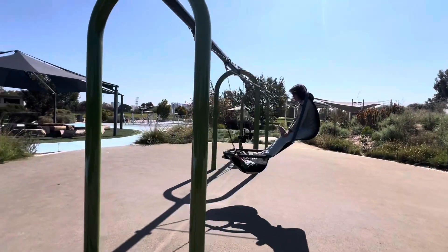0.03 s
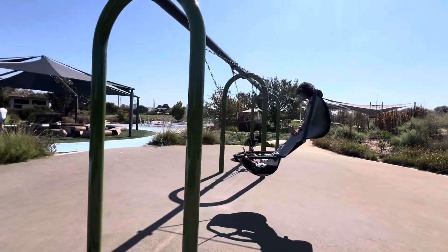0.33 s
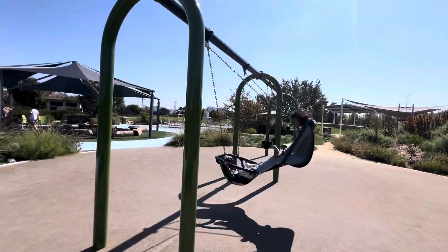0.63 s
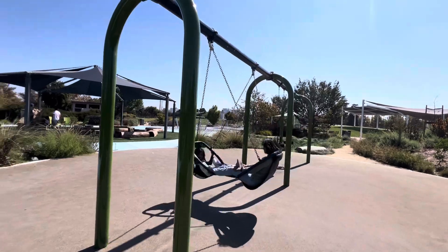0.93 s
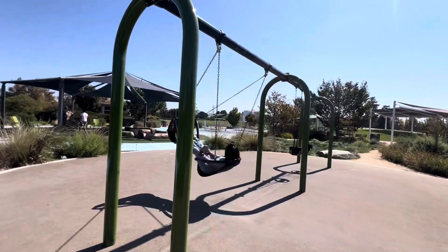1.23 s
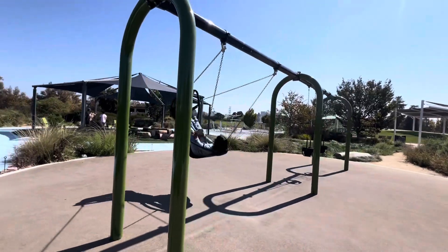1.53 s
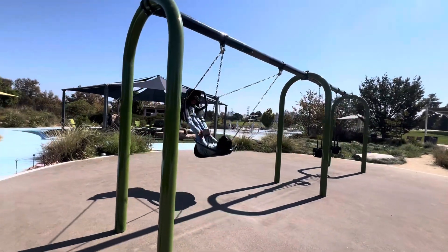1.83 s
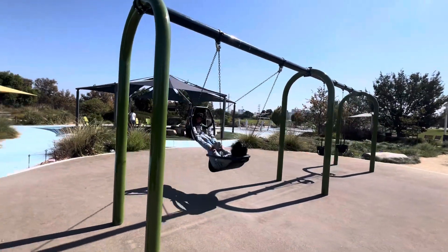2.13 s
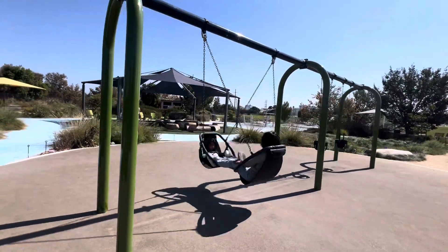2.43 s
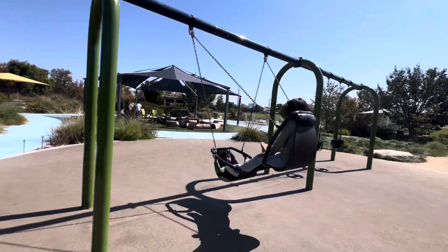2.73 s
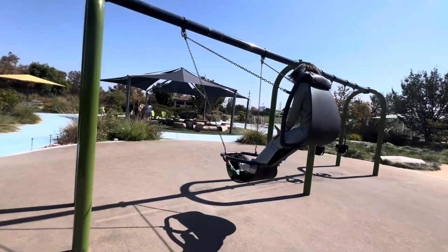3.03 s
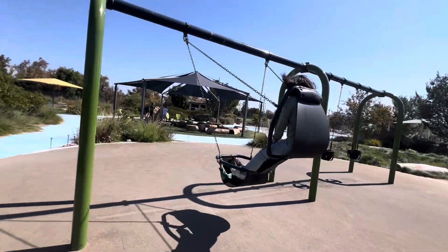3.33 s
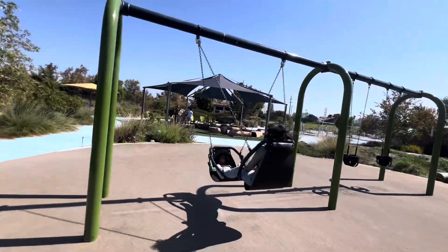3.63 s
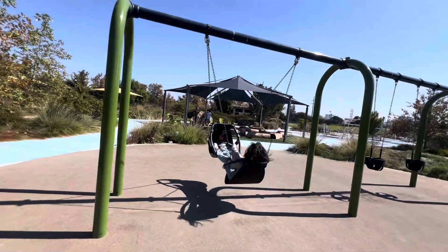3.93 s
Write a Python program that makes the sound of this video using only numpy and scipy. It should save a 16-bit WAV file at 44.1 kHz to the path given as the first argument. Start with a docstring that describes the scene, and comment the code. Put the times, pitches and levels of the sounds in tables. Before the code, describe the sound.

A playground swing's steel chains clack, briefly ringing the frame: a sharp cluster around 0.5 to 0.7 seconds, a softer clack at 1.3, and more at 2.6 and 3.5. Light ticks and faint rubs fall between. A far bird chirps faintly three times in the first second. Distant traffic and wind rumble throughout under a faint hiss, and a vehicle's humming tyres swell past from about 2 seconds.

```python
"""An open playground, where a chair swing sways on steel chains. Each time the load shifts, links slip
and clack against the hangers, briefly ringing the steel frame; light ticks and soft rubs fall in between.
A far bird chirps three times. Behind it, distant traffic rumbles over a deep drone of wind and engines,
one vehicle swells past on humming tyres, and a faint hiss sits on top."""
import sys
import numpy as np
from scipy import signal
from scipy.fft import rfft, irfft
from scipy.io import wavfile
from scipy.ndimage import uniform_filter1d

SR = 44100
rng = np.random.default_rng(int(sys.argv[2]) if len(sys.argv) > 2 else 0)


def wav_record(signal):
    """Record a signal, one row per channel, as 16-bit PCM in the file named by sys.argv[1]."""
    frames = np.transpose(np.atleast_2d(signal))
    bounded = np.clip(frames, -1, 1)
    # unit amplitude maps onto the largest positive 16-bit level
    quanta = np.round(bounded * 32767).astype(np.int16)
    wavfile.write(sys.argv[1], SR, quanta)


N = 176400
TIME = np.arange(N) / SR
CUTOFF_HZ = 15900


# link slips: start_s, level_db, brightness_db_per_octave, attack_s, chatter_s
LINK_SLIPS = [(.117, -54, -2, 0.0012, 0.0082), (0.1434, -44, -1.5, 0.0011, 0.0023),
              (0.502, -55.5, 0, 0.0016, 0.0061), (0.5415, -31.5, 1.5, 0.0063, 0.0061),
              (0.5841, -31.5, 1.3, 0.0016, 0.008), (0.688, -30.5, 1.44, 0.00061, 0.012),
              (1.3381, -45, 1, 0.0018, .009), (1.354, -45.5, -0.5, .003, 0.011),
              (2.5604, -34.5, 1.3, 0.0051, 0.009), (2.585, -38, -2, 0.002, 0.0026),
              (2.999, -57.5, -4, 0.0028, 0.0104), (3.405, -52, -1.5, 0.0038, 0.012),
              (3.465, -44.5, -2, 0.0023, 0.012), (3.4825, -35.5, -0.3, 0.00078, 0.0068),
              (3.536, -31, 0, 0.0011, 0.012)]

def clacks(contacts_per_s=2100, contact_decay_s=0.005, contact_db=1, strike_spread_db=3.5):
    """A link slips, chatters for a few milliseconds in sharp contacts, and leaves the frame ringing."""
    hz, gain, t60 = frame_modes()
    t, out = np.arange(8192) / SR, np.zeros((2, N))
    modes = np.exp((2j * np.pi * hz - np.log(1000) / t60)[:, None] * t)
    bins = np.fft.rfftfreq(len(t), 1 / SR)
    clack_eq = unit(amp(read(CLACK_COLOUR, bins)))
    for start, db, brightness, attack, chatter in LINK_SLIPS:
        tilt = lambda f: amp(brightness * np.log2((f + 100) / 5000))
        strike = gain * tilt(hz) * amp(strike_spread_db * rng.standard_normal(len(hz)))
        phases = np.exp(2j * np.pi * rng.random((2, len(hz))))
        ring = ((strike * phases) @ modes).real
        ring *= np.exp(np.log(1000) / np.median(t60) * np.minimum(t, chatter))  # chatter holds the ring up
        hits = rng.standard_normal((2, len(t))) * (rng.random((2, len(t))) < contacts_per_s / SR)
        contacts = irfft(rfft(unit(hits)) * clack_eq * tilt(bins)) * np.exp(-t / contact_decay_s)
        add(out, start, amp(db) * np.minimum(t / attack, 1) * (ring + amp(contact_db) * contacts))
    return out


# tone colour of the clacks, with dips near 10 and 14 kHz: freq_hz, gain_db
CLACK_COLOUR = [(150, -7), (450, 7), (800, 3.5), (1100, 11), (2300, 8.5), (4100, -0.5), (4700, 3.5),
                (5400, 1.5), (6300, 4), (7200, -4.5), (9200, 0), (10100, -8), (11200, 0), (12500, -1),
                (13700, -12), (15200, 2)]
# ring time of the frame: freq_hz, t60_s
FRAME_DECAY = [(400, 0.17), (1000, 0.17), (2200, 0.15), (5500, 0.1), (10000, 0.16), (15000, 0.12)]
# strongest modes of hanger and crossbar, several in close pairs: pitch_hz, gain_db
HANGER_MODES = [(938, -14), (1040, -14), (1275, -13.5), (2338, -14.5), (2461, -19), (3053, -14),
                (3762, -18), (3805, -17), (4488, -19), (4651, -17), (4748, -16), (4807, -17), (5798, -21),
                (8554, -21)]

def frame_modes(count=480, spread_db=1.5, frame_db=0.5, hanger_trim_db=-3.5):
    """The frame's crowded weak modes and the hanger's strong, longer ones: pitch_hz, gain, t60_s."""
    frame_hz = (np.arange(count) + rng.random(count)) * CUTOFF_HZ / count + 100
    frame_gain = amp(read(CLACK_COLOUR, frame_hz) + spread_db * rng.standard_normal(count))
    frame_gain *= amp(frame_db) / np.linalg.norm(frame_gain)
    hanger_hz, hanger_db = np.transpose(HANGER_MODES)
    t60 = np.r_[read(FRAME_DECAY, frame_hz), 1.15 * read(FRAME_DECAY, hanger_hz)]
    return np.r_[frame_hz, hanger_hz], np.r_[frame_gain, amp(hanger_db + hanger_trim_db)], t60


# the clacks' delay on the right, and how alike their two sides are: freq_hz, likeness_ratio
RIGHT_LAG_S, CLACK_LIKENESS = 0.0002423, [(2000, 0.55), (7000, 0.083), (10000, 0.94), (15000, 0.5)]

def place_swing(x):
    """The right side gets a late copy of the left side's clack, blended with its own reflections."""
    hz = np.fft.rfftfreq(N, 1 / SR)
    same = read(CLACK_LIKENESS, hz)
    left, right = rfft(x)
    late = left * np.exp(-2j * np.pi * hz * RIGHT_LAG_S)
    return np.array([x[0], irfft(same * late + np.sqrt(1 - same ** 2) * right, N)])


# light, dry chain ticks: start_s, level_db, centre_hz
CHAIN_TICKS = [(0.919, -43.5, 5440), (1.7093, -61, 8800), (1.7272, -52, 8800), (1.7562, -45.5, 7900),
               (1.7886, -50.5, 8200), (1.8135, -67, 9500), (1.9697, -54, 7500), (1.974, -53, 4300),
               (2.509, -43, 5200)]

def ticks(decay_s=0.00094, width_octaves=0.3):
    """Single links touch without ringing the frame."""
    t, out = np.arange(1024) / SR, np.zeros((2, N))
    hz = np.fft.rfftfreq(len(t), 1 / SR)
    envelope = t / decay_s * np.exp(-t / decay_s)
    for start, db, centre in CHAIN_TICKS:
        colour = np.exp(-.5 * (np.log2((hz + 1) / centre) / width_octaves) ** 2)
        burst = unit(irfft(rfft(rng.standard_normal((2, len(t)))) * colour))
        add(out, start, amp(db) * envelope * burst)
    return out


# chain rubbing in its hanger: start_s, length_s, level_db, centre_hz, glide_octaves
CHAIN_RUBS = [(0.065, 0.036, -65, 3220, 0.029), (1.841, 0.026, -62, 2980, -0.083),
              (2.701, 0.14, -65, 3540, 0.0011), (2.947, 0.73, -61, 3510, 0.19),
              (3.593, 0.48, -57, 2498, 0.074)]

def rubs(width_hz=1370):
    """Links turn under load with a soft, narrow rasp."""
    out = np.zeros((2, N))
    for start, length, db, centre, glide in CHAIN_RUBS:
        progress = np.linspace(0, 1, int(length * SR))
        sweep = centre * 2 ** (glide * (progress - .5))
        rasp = np.array([band(sweep, width_hz).real for _ in range(2)])
        add(out, start, amp(db) * np.sin(np.pi * progress) * rasp)
    return out


# far chirps: start_s, length_s, level_db, top_pitch_hz, arch_depth_ratio
BIRD_CHIRPS = [(0.277, 0.125, -71.5, 4520, .33), (0.83, 0.036, -57.5, 4930, .02),
               (0.976, 0.038, -68, 5080, .03)]

def bird(skew=0.62, waver_depth=0.02):
    """Short, wavering whistles whose pitch rises quickly and falls more slowly."""
    out = np.zeros((2, N))
    for start, length, db, top_hz, depth in BIRD_CHIRPS:
        progress = np.linspace(0, 1, int(length * SR))
        waver = unit(uniform_filter1d(rng.standard_normal(SR), size=60))[:len(progress)]
        arch = np.sin(np.pi * progress ** skew)
        pitch = top_hz * (1 - depth * (1 - arch) + waver_depth * waver)
        whistle = np.sin(2 * np.pi * np.cumsum(pitch) / SR)
        add(out, start, amp(db) * np.sin(np.pi * progress) * whistle)
    return out


def yard_reverb(x, wet_db=-21, t60_s=0.69, top_hz=4600, attack_s=0.019):
    """Weak, dull scatter from the ground, shelters and bushes."""
    t = np.arange(SR // 2) / SR
    scatter = signal.lfilter(*signal.butter(2, top_hz, fs=SR), rng.standard_normal((2, len(t))))
    tail = scatter * amp(-60 * t / t60_s) * np.minimum(t / attack_s, 1)
    return amp(wet_db) * signal.fftconvolve(x, tail / np.linalg.norm(tail[0]), axes=1)[:, :N]


# hum of the passing tread: time_s, level_db, pitch_hz
TREAD_HUM = [(0.6, -68, 651), (1.801, -44.5, 661.2), (2.55, -38, 716.7), (2.942, -37, 652.3),
             (3.061, -41, 662), (3.3, -40.5, 717.6), (3.75, -44, 700.6), (4, -54, 674)]

def tread(width_hz=260):
    """The tyres' hum swells twice and sinks in pitch after each swell."""
    times, db, hz = np.transpose(TREAD_HUM)
    hum = amp(np.interp(TIME, times, db)) * band(np.interp(TIME, times, hz), width_hz)
    left = amp(read(FAR_BALANCE, hz.mean())) * hum
    right = np.exp(-1j * read(FAR_PHASE, hz.mean())) * hum
    return np.array([left, right]).real


# EQ of the road rumble and the tyre roar: freq_hz, gain_db
RUMBLE_EQ = [(30, -35), (60, -9), (110, -1), (180, -6), (260, 1), (400, -10), (520, -5), (800, -22),
             (1700, -18), (2600, -28.5), (4200, -63.5), (7000, -52), (14000, -87.5)]
ROAR_EQ = [(150, -20.5), (330, -4), (480, -2.5), (640, -1), (820, -7), (1000, 2), (1250, -1.5),
           (1800, -6.5), (2600, -26), (3700, -26.5), (5000, -41.5), (9000, -73.5)]
# their fader rides: time_s, level_db
RUMBLE_FADER = [(0, -48.5), (.15, -46), (.5, -43.5), (.9, -41), (1.8, -40.5), (2.4, -39.5), (3.2, -39)]
ROAR_FADER = [(0, -50.5), (.6, -44.5), (1.1, -45), (1.5, -52.5), (2, -44.5), (2.6, -39), (3.2, -46),
              (4, -46)]

def traffic():
    """A bed of low rumble, and tyre roar that swells as a vehicle passes."""
    rumble = fader(RUMBLE_FADER) * noise(RUMBLE_EQ, patchy_db=1.33)
    roar = fader(ROAR_FADER) * noise(ROAR_EQ, patchy_db=1.33)
    return rumble + roar


# EQ of the low drone: freq_hz, gain_db
DRONE_EQ = [(30, -31.5), (42, -9.5), (60, 4), (85, -7.5), (130, -16.5), (300, -25.5), (1000, -88.5)]
# its fader ride: time_s, level_db
DRONE_FADER = [(0, -43), (.12, -57), (.7, -52.5), (.93, -44.5), (1.35, -44.5), (1.85, -43.5), (2.2, -48.5),
               (3.1, -45.5)]

def drone():
    """Wind and far engines fill out the low end."""
    return fader(DRONE_FADER) * noise(DRONE_EQ, patchy_db=0.5)


# level of the hiss, then EQ of hiss and fizz: freq_hz, gain_db
HISS_DB, HISS_EQ = -69.5, [(2500, -17.5), (5000, -2), (6600, -7), (7450, 8), (8300, -10), (11000, -55.5)]
FIZZ_EQ = [(2500, -2), (5700, -2), (7000, -3), (9700, 6), (11500, -11.5), (15000, -25)]
# fader ride of the fizz: time_s, level_db
FIZZ_FADER = [(0, -84), (.3, -80), (1.05, -86), (1.3, -77), (1.65, -74.5), (2, -88)]

def hiss():
    """A faint high fizz comes and goes over the hiss of the left microphone."""
    out = fader(FIZZ_FADER) * noise(FIZZ_EQ, patchy_db=2.5, distant=False)
    out[0] += amp(HISS_DB) * noise(HISS_EQ, patchy_db=2.0, distant=False)[0]
    return out


# how alike the two sides of distant sound are: freq_hz, likeness_ratio
FAR_LIKENESS = [(700, 1), (1500, 0.61), (3500, 0), (6000, 1.2)]
# its phase between the sides: freq_hz, left_lead_rad
FAR_PHASE = [(40, 0.5), (110, 0.54), (200, -1.24), (330, -2), (520, -3), (700, -4), (880, -8.5),
             (1100, -10.5), (1400, -16.5), (1550, -16.5), (2100, -21.5), (2900, -21.5)]
# its pan: freq_hz, left_over_right_db
FAR_BALANCE = [(60, 1.5), (300, -1), (470, 0), (680, -14.5), (830, 12), (1000, -5.5), (1220, -8.5),
               (1750, 1), (2500, -0.5), (4500, 3)]

def noise(eq, patchy_db, distant=True):
    """Stereo noise with drifting patches of colour; distant sound is also placed left and right."""
    hz = np.fft.rfftfreq(2048, 1 / SR)
    left_re, left_im, right_re, right_im, patches = rng.standard_normal((N // 512 + 5, len(hz), 5)).T
    left, right = left_re + 1j * left_im, right_re + 1j * right_im
    if distant:
        same = np.clip(read(FAR_LIKENESS, hz), 0, 1)[:, None]
        right = same * left + np.sqrt(1 - same ** 2) * right
        right *= np.exp(-1j * read(FAR_PHASE, hz))[:, None]
        pan = amp(read(FAR_BALANCE, hz))[:, None]
        left, right = left * pan / np.hypot(1, pan), right / np.hypot(1, pan)
    patches = unit(uniform_filter1d(uniform_filter1d(patches, size=9, axis=0), size=10, axis=1))
    spectra = np.array([left, right]) * amp(read(eq, hz)[:, None] + patchy_db * patches)
    return unit(signal.istft(spectra, nperseg=2048, noverlap=1536)[1][:, :N])


def band(hz, width_hz):
    """Complex noise in a resonance that follows the curve hz; its real part has rms near 1."""
    pole = np.exp(-np.pi * width_hz / SR)
    flutter = rng.standard_normal((len(hz), 2)) @ [1, 1j]
    for _ in range(3):
        flutter = signal.lfilter([1 - pole], [1, -pole], flutter)
    return flutter / flutter.real.std() * np.exp(2j * np.pi * np.cumsum(hz) / SR)


def amp(db):
    """Decibels to gain."""
    return 10 ** (np.asarray(db) / 20)


def unit(x):
    """Scales to rms 1."""
    return x / np.sqrt(np.mean(x ** 2) + 1e-20)


def read(points, hz):
    """Reads a table on a log-frequency axis."""
    freq, value = np.transpose(points)
    return np.interp(np.log(hz + 1), np.log(freq + 1), value)


def fader(points):
    """Gain over time from rows of time_s, level_db."""
    return amp(np.interp(TIME, *np.transpose(points)))


def add(mix, start_s, sound):
    """Drops a sound into the stereo mix at start_s."""
    part = mix[:, max(round(start_s * SR), 0):][:, :sound.shape[-1]]
    part += sound[..., :part.shape[1]]


def scene():
    """The swing and the bird in the open yard, over a bed of traffic, wind and hiss."""
    spots = place_swing(clacks()) + ticks() + rubs() + bird()
    return spots + yard_reverb(spots) + traffic() + tread() + drone() + hiss()


def record(dry):
    """A 40 Hz low cut against wind, then a steep high cut."""
    low_cut = signal.butter(4, 40, "highpass", fs=SR, output="sos")
    high_cut = signal.firwin(301, CUTOFF_HZ, window=("kaiser", 9), fs=SR)
    return signal.oaconvolve(signal.sosfilt(low_cut, dry), high_cut[None], "same")


dry = scene()
out = record(dry)
wav_record(out)
```